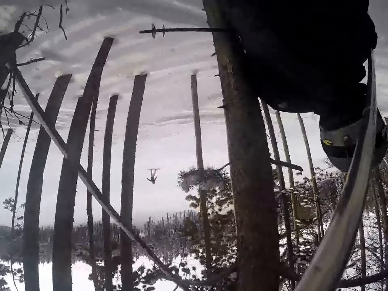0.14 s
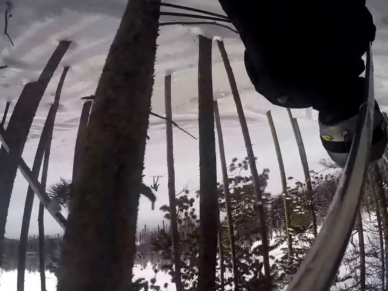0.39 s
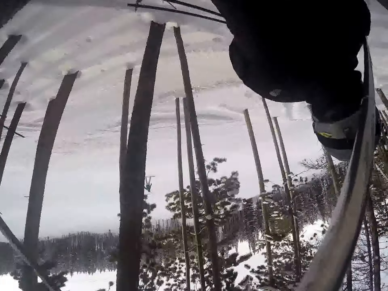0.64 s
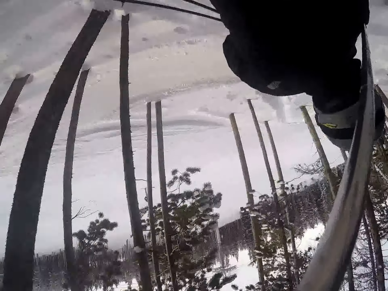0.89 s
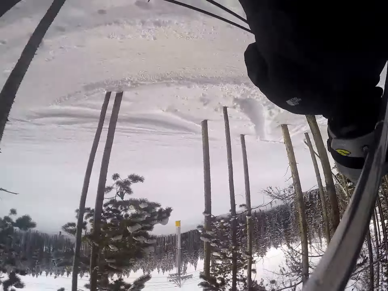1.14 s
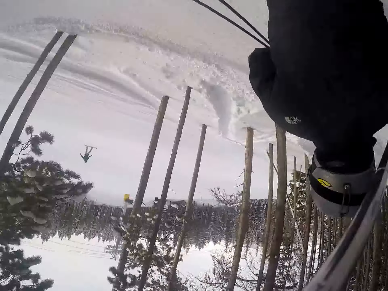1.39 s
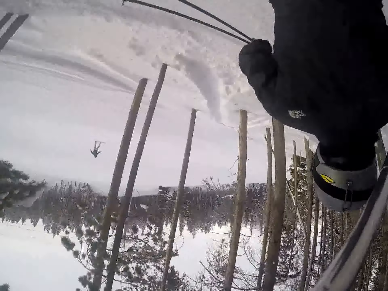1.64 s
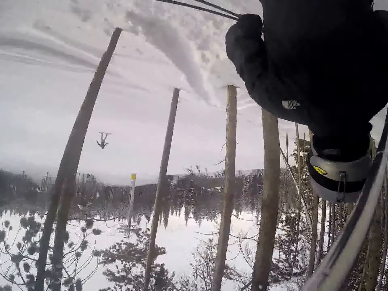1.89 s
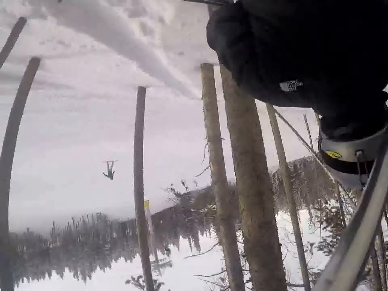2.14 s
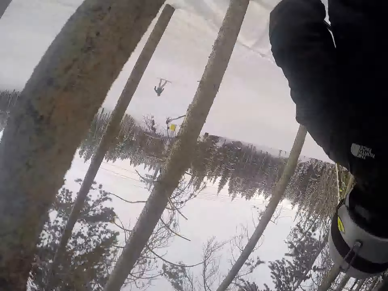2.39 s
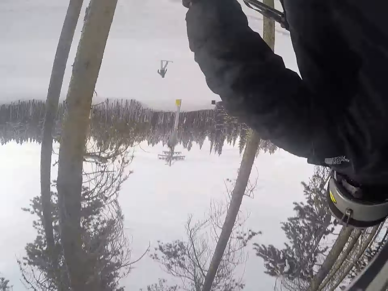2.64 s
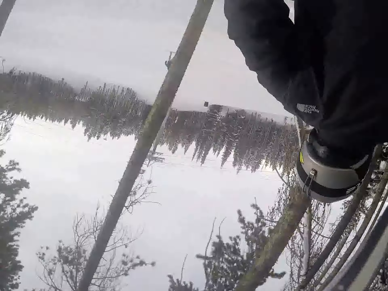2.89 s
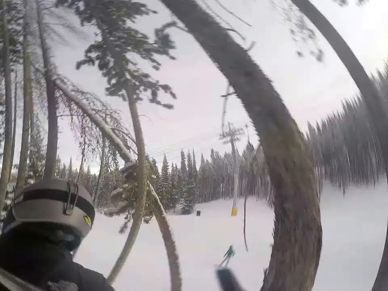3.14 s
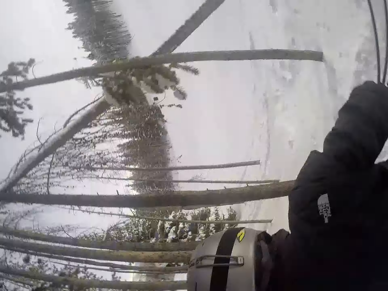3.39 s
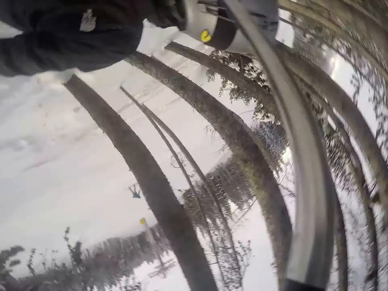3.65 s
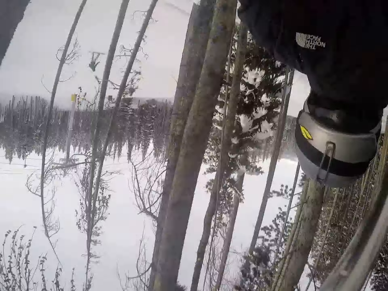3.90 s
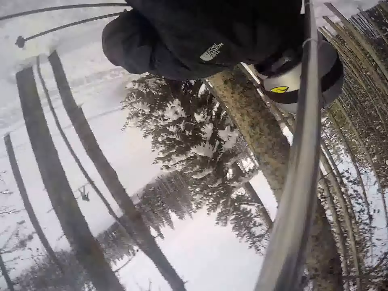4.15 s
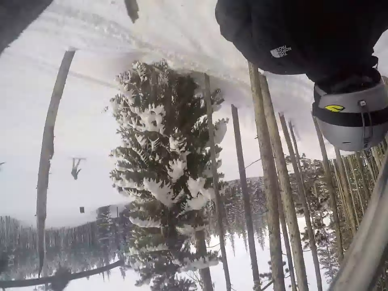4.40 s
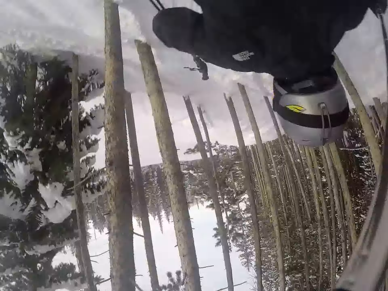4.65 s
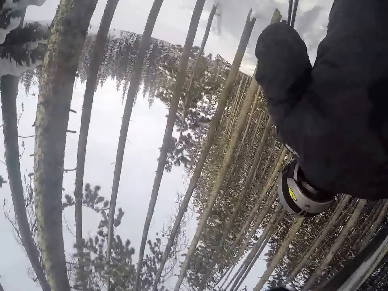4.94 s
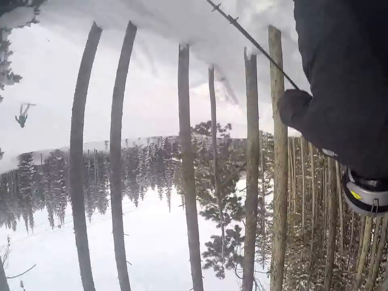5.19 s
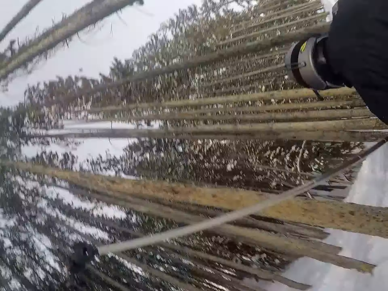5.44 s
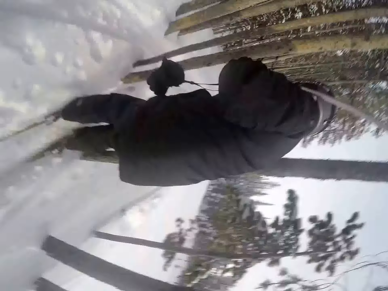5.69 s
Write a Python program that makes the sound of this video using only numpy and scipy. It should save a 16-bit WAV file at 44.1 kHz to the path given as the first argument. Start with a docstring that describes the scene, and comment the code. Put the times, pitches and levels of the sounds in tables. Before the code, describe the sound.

Heard from a single microphone sealed in a plastic camera housing on a pole, a skier passes through snowy trees. Quiet wind rumble and faint swishing brushes come first. After about two and a half seconds, twigs crack and knock hard on the shell in irregular clusters, with deep jolts and hollow scraping. A last thump leaves a very short, thin ring and near silence with tiny ticks.

```python
"""Snowy trees, inside the closed plastic housing of a camera on a pole, with one microphone in the housing.
Wind noise buffets it, grains of snow and needles scrape along it, and bursts of grit crack as twigs on the shell.
Jolts are short swings of mount and pole; a last thump leaves three sine modes of the pole ringing in near
silence, with a few tiny ticks. Rubbing and the bodies of the cracks ring through the housing's resonances."""
import sys
import numpy as np
from scipy import signal
from scipy.fft import rfft, irfft, next_fast_len
from scipy.io import wavfile
from scipy.ndimage import uniform_filter1d, map_coordinates

SR = 44100
rng = np.random.default_rng(int(sys.argv[2]) if len(sys.argv) > 2 else 0)


def ratio_of_db(decibels):
    """Turn decibels (scalar or array-like) into linear amplitude factors; 0 dB maps to 1."""
    return 10 ** (np.asarray(decibels, float) / 20)


def put_to_file(sound):
    """Save the sound as 16-bit audio at rate SR, in the file named by the first command-line argument."""
    columns = np.atleast_2d(sound).T  # one column per channel
    safe = np.clip(columns, -1, 1)
    whole_steps = np.round(safe * 32767)
    wavfile.write(sys.argv[1], SR, whole_steps.astype(np.int16))


N = 255780  # samples


def unit(x):
    """Scale to rms 1."""
    return x / np.sqrt(np.mean(x ** 2) + 1e-20)


def colour(points):
    """Gain against frequency from (Hz, dB) points on a log axis."""
    hz_points, db = np.transpose(points)
    return lambda hz: ratio_of_db(np.interp(np.log(hz + 1), np.log(hz_points + 1), db))


def filtered(x, response):
    """x times a complex response of frequency."""
    n = x.shape[-1]
    padded = next_fast_len(n + 2048)
    spectrum = rfft(x, padded) * response(np.fft.rfftfreq(padded, 1 / SR))
    return irfft(spectrum, padded)[..., :n]


def resonance(hz, centre_hz, width_hz):
    """Response of one damped mode, with gain 1 at its centre."""
    return 1j * hz * width_hz / (centre_hz ** 2 - hz * hz + 1j * hz * width_hz)


def wobble(rate):
    """A smooth random curve, rate knots a second."""
    knots = rng.standard_normal(int(N * rate / SR) + 4)
    return map_coordinates(knots, [np.arange(N) * rate / SR])


def gritty(grain_db, flutter_db):
    """Noise of dense grains with a long tail of sizes, fluttering in strength."""
    grains = rng.standard_normal(N) * ratio_of_db(grain_db * rng.exponential(size=N))
    return grains * ratio_of_db(flutter_db * (wobble(35) + wobble(140)))


def patchy(x, patch_db):
    """x with patches of random gain, some hundred hertz wide and a few hundredths of a second long."""
    spectrum = signal.stft(x, nperseg=512)[2]
    field = rng.standard_normal(spectrum.shape)
    field = uniform_filter1d(field, size=5, axis=0)
    field = uniform_filter1d(field, size=12, axis=1)
    return signal.istft(spectrum * ratio_of_db(patch_db * unit(field)), nperseg=512)[1][:N]


def placed(sounds, times):
    """Sum of short sounds (rows) started at the given seconds."""
    at = np.round(times * SR).astype(int)[:, None] + np.arange(sounds.shape[1])
    return np.bincount(at.ravel(), sounds.ravel(), N + SR)[:N]


def peak_one(sounds):
    """Each row scaled so that its loudest millisecond or so has envelope 1."""
    power = uniform_filter1d(np.abs(signal.hilbert(sounds)) ** 2, size=53, axis=1)
    return sounds / np.sqrt(power.max(axis=1, keepdims=True))


def curves(rows):
    """One value per sample for each column after the time."""
    s, *columns = np.transpose(rows)
    return [np.interp(np.arange(N) / SR, s, column) for column in columns]


# resonances of the housing, the hollow ones first: pitch_hz, width_hz, level_db (before lifts and wall filter)
HOUSING_MODES = [(995, 316, -2), (1252, 330, -6), (1646, 245, 5.5), (2102, 80, -11), (3100, 450, -21)]


def shell(hz, hollow_db, thin_db, scatter_db=np.zeros(len(HOUSING_MODES))):
    """Causal response of the housing; hollow_db lifts its two lowest resonances, thin_db the fourth."""
    lift_db = [hollow_db, hollow_db, 0, thin_db, 0]
    ring = sum(ratio_of_db(db + lift + scatter) * resonance(hz, centre_hz, width_hz)
               for (centre_hz, width_hz, db), lift, scatter in zip(HOUSING_MODES, lift_db, scatter_db))
    walls = (1j * hz / (700 + 1j * hz) / (1 + 1j * hz / 3500)) ** 2  # the walls pass only the middle
    return ring * walls


# twigs and branches touching the shell, at no distance:
# start_s (hardest push follows), level_db (body peak), contact_ms, snap_db (over body), hollow_db (extra lift)
TWIG_CRACKS = [(2.3133, -21, 5.7, -18, 6), (2.5941, -14, 1.4, -26, -14), (2.6645, -21, 3.1, -42, 7),
               (2.6737, 2, 1, -48, -10), (2.6796, -0.5, 2.2, -55.5, -7.5), (2.689, -2, 2.7, -38, -4),
               (2.7077, -6, 1.3, -36, 12), (2.7162, -6.5, 3.7, -41, -6), (2.7312, 4.5, 1.75, -16, -10),
               (2.77, -19.5, 1, -35, -10), (2.775, -16, 2.6, -37, -11), (2.8553, -19, 0.88, -44, 9),
               (2.8678, -2, 0.85, -10, -12), (2.8773, -8.5, 2.5, -22, -5), (2.89, -20, 1, -44, 18),
               (2.8964, -14, 2.3, -37, 2), (2.992, -30, 1.8, -41, -2), (3.0108, -25.5, 10, -27, 23),
               (3.0366, -17, 3, -41, 1), (3.052, -15.5, 5.9, -35.5, 1), (3.0743, -3.5, 2.6, -16.5, -4),
               (3.0798, -9, 3.3, -43.5, -2), (3.0921, -5, 3.5, -4.5, -2), (3.108, -13, 1.3, -44, -4),
               (3.1139, -3.5, 1.4, -68, -16), (3.1606, -6.5, 2.2, -64, -19), (3.1687, -1, 1.2, -27, -8.5),
               (3.2447, -14.5, 3.9, -31, -7), (3.2515, -19, 2.2, -36, -5), (3.3103, -16, 3, -12.5, 11),
               (3.329, -1.5, 4.8, -18.5, 0), (3.3506, -5, 1.6, -36, 12), (3.377, -19.5, 3.5, -43, 11),
               (3.393, -9, 1.06, -25, -9), (3.4001, -9.5, 1.95, -33, -25), (3.4072, -9.5, 2.6, -37, 9),
               (3.46, 0, 2.77, -13.5, -16), (3.497, -24, 5.7, -35, 10), (3.5152, -4.5, 5.7, -16.5, -15.5),
               (3.6394, -19, 2.3, -34, 17), (3.673, -16, 4.8, -23, -25), (3.7074, -19, 1.45, -51, 29),
               (3.714, -21.5, 1.9, -35, 18), (3.732, -22, 11.4, -32, -7), (3.7418, -18, 3.4, -45, -22),
               (3.8424, -23, 3.9, -40, 0), (3.8649, -11, 2.6, -20.5, -3), (3.872, -7.5, 3.3, -23, -10.5),
               (3.9105, -15.5, 1.9, -42, -4), (3.923, -27, 2.2, -46, 14), (4.0908, -28.5, 2.1, -47, 15),
               (4.113, -20.5, 2.7, -40, -10), (4.2076, -17.5, 6.3, -18, 0),
               (4.3616, -10.5, 3.4, -31.5, -5.5), (4.3687, -11.5, 1.7, -29, -5.5),
               (4.405, -13.5, 3.9, -39.5, -8.5), (4.4231, 4.5, 2.1, -27.5, -23),
               (4.4699, -22, 1.6, -41, 0.0), (4.4759, -20.5, 3.7, -23.5, -10.5),
               (4.4888, -16, 2, -16.5, -8), (4.5214, -15.5, 0.51, -36.5, 0.5), (4.5318, 2, 1.9, -17.5, -12),
               (4.5781, -0.5, 0.52, -27.5, -9), (4.584, 1, 2.1, -15.5, -5), (4.605, -9, 2.2, -26, -16),
               (4.6101, 1.5, 1.37, -23.5, 6), (4.6383, -11, 2.2, -34, -30), (4.6846, -14, 0.63, -44.5, 0.5),
               (4.6953, -12, 4.5, -26.5, -12), (4.7076, -7, 4.2, -16.5, -15), (4.7155, -17, 2.9, -44, -2),
               (4.826, -9.5, 4.2, -37.5, 12), (4.8388, 1, 2.85, -33, -5.5), (4.846, -5.5, 1.9, -40, -9),
               (4.861, -12, 3.4, -40.5, -7.5), (4.867, -11.5, 6.8, -16, -13.5),
               (5.1215, -22.5, 1.1, -38.5, 5), (5.144, -13, 1.7, -29, -13), (5.154, -16, 1.1, -44, 19),
               (5.1653, -8.5, 2.3, -52, 6), (5.205, -24, 5.9, -43.5, 5), (5.2322, -5.5, 2.2, -12, -9),
               (5.2375, 0.5, 2.9, -22, -11.5), (5.3518, -26.5, 0.95, -39, -20),
               (5.3891, -15, 1.2, -43.5, 7.5), (5.406, -19.5, 3.5, -38.5, 5.5),
               (5.4159, -6.5, 1.4, -18, 3.5), (5.4244, 5, 2.34, -19, 8.5)]
# spectrum of the snap: pitch_hz, level_db (relative)
SNAP_COLOUR = [(2700, -27.5), (3500, 3), (6000, -12.5), (11000, -29.5), (15800, -42.5), (16600, -58.5)]


def cracks():
    """Each contact is a short burst of grit that rings the shell at new strengths, with a sharper snap on top."""
    contacts = np.vstack([TWIG_CRACKS, twiglets()])
    start_s, level_db, contact_ms, snap_db, hollow_db = contacts.T[..., None]
    lead_s = .008
    u = (np.arange(2048) / SR - lead_s) / (contact_ms / 1000) - .3  # contact lengths from the hardest push
    push = ratio_of_db(np.where(u < 0, 16 * u, -12 * u))  # force builds up and lets go
    drag = ratio_of_db(np.where(u < 0, 7 * u, -3.5 * u) - 25)  # the twig slides on before and after
    # a brief snap of noise, swelling and dying around the hardest push
    snap_swell = ratio_of_db(np.where(u < .1, 22 * (u - .1), -40 * (u - .1)))
    noise = rng.standard_normal((len(contacts), 2, u.shape[1])) * np.hanning(u.shape[1]) ** .5
    scatter_db = 3 * rng.standard_normal((len(contacts), len(HOUSING_MODES))).T[..., None]

    def blunt_shell(hz):
        blunt = (1 + 1j * hz / 2600 - (hz / 2500) ** 2) ** 1.51  # soft bark dulls the treble
        return shell(hz, hollow_db + 11, -7.5, scatter_db) / blunt

    body = peak_one(filtered((push + drag) * noise[:, 0], blunt_shell))
    snap = peak_one(filtered(snap_swell * noise[:, 1], colour(SNAP_COLOUR)))
    return placed(ratio_of_db(level_db) * (body + ratio_of_db(snap_db) * snap), start_s[:, 0] - lead_s)


# stay in the thicket: start_s, end_s
THICKET_SPAN = (2.75, 5.41)


def twiglets(count=40):
    """Small twigs touch at random in the thicket, as strong as the slide presses; rows as in TWIG_CRACKS."""
    draw = rng.random((count, 5))
    start_s, end_s = THICKET_SPAN
    s = start_s + (end_s - start_s) * (np.arange(count) + draw[:, 0]) / count
    press_db = np.interp(s, *np.transpose(SNOW_SLIDE)[:2])
    level_db = press_db + 11.5 - 2.5 * np.log(1 - draw[:, 1])  # a few stand out
    contact_ms = 2.6 * (.5 + draw[:, 2])
    snap_db = -34 + 16 * (draw[:, 3] - .5)
    hollow_db = 32 * (draw[:, 4] - .6)
    return np.transpose([s, level_db, contact_ms, snap_db, hollow_db])


# quick thuds of the mount and slow sways of the pole: peak_s, level_db (swing at its peak), pitch_hz
MOUNT_JOLTS = [(0.503, -23.5, 34.6), (1.356, -34, 63.5), (1.637, -27.5, 63), (2.298, -17.5, 37.0),
               (2.347, -17, 30.5), (2.458, -19, 29.2), (2.554, -18, 44.0), (2.608, -12.5, 25.5),
               (2.674, -12, 160.0), (2.681, -17, 35.0), (2.684, -6, 131), (2.695, -11, 89.0),
               (2.709, -5.5, 137), (2.737, -5, 142.0), (2.747, -5.5, 35.4), (2.792, -11.5, 26.4),
               (2.872, -18.0, 95), (2.884, -13.5, 130), (2.899, -17, 34.7), (3.053, -15, 98),
               (3.066, -23, 85.0), (3.077, -10, 107), (3.094, -0.5, 161), (3.104, -3.5, 39.7),
               (3.172, -15, 167), (3.248, -14.5, 154), (3.263, -15.5, 33), (3.339, -5, 154),
               (3.348, -11.5, 107), (3.346, -6.5, 36.1), (3.406, -16, 129), (3.432, -12, 34.3),
               (3.465, -7.5, 123.0), (3.474, -8, 40.6), (3.644, -14.5, 156), (3.872, -16, 148),
               (3.904, -8, 26.5), (3.951, -15.5, 23.8), (4.214, -11.5, 140.0), (4.22, -17.5, 31.0),
               (4.428, -10, 159), (4.444, -14, 31.8), (4.534, -4.5, 116), (4.571, -13.5, 27.0),
               (4.584, -16.5, 89.0), (4.591, -13, 116), (4.612, -2.5, 210), (4.627, -4, 36.3),
               (4.701, -10, 112), (4.712, -16, 38.0), (4.712, -8.5, 130), (4.746, -22, 110.0),
               (4.833, -16.5, 93), (4.842, -9, 38.3), (4.843, -4, 145.0), (4.853, -10, 162),
               (4.872, -12, 130), (4.899, -7, 25.5), (5.171, -14.5, 168), (5.244, -12, 109),
               (5.255, -11.5, 29.0), (5.421, -2.5, 133.0), (5.44, -16, 33.0)]
# the mount's own resonance, rung by each jolt: pitch_hz, width_hz, level_db (gain at its centre)
MOUNT_MODE = (123, 15, -10)


def jolts():
    """A jolt is a swing of a cycle or two, pushing forward at its peak; the mount rings on briefly."""
    peak_s, level_db, pitch_hz = np.transpose(MOUNT_JOLTS)[..., None]
    cycles = np.arange(6000) / SR * pitch_hz
    rise = 0.43  # cycles up to the peak
    u = cycles / rise
    onset = 1 - np.exp(-(u / .25) ** 2)
    envelope = onset * u ** 0.52 * np.exp(1.424 * (1 - u))
    swing = envelope * np.cos(2 * np.pi * (cycles - rise) + 0.1)
    jolt = placed(ratio_of_db(level_db) * swing, (peak_s - rise / pitch_hz)[:, 0])
    centre_hz, width_hz, ring_db = MOUNT_MODE
    return jolt + ratio_of_db(ring_db) * filtered(jolt, lambda hz: resonance(hz, centre_hz, width_hz))


# ringing modes of the pole: pitch_hz, level_db (relative), t60_s (time to fall 60 dB)
POLE_MODES = [(436, -15, .24), (646, 0, .14), (1878, -7, .2)]


def pole():
    """Three clean modes of the pole die away after the last thump."""
    last_thump_s = 5.427
    t = np.arange(SR // 3) / SR
    ring = sum(ratio_of_db(db - 60 * t / t60) * np.sin(2 * np.pi * hz * t) for hz, db, t60 in POLE_MODES)
    return placed(ratio_of_db(-23.5) * ring[None], np.array([last_thump_s]))


# spectra of swish, spray and rumble (the wind rumbles with it too): pitch_hz, level_db (relative)
SWISH_COLOUR = [(1800, -39), (2450, 5), (2850, -11), (3450, 1.5), (3900, -9.5), (4700, -23), (6000, -44)]
SPRAY_COLOUR = [(3500, -24), (4600, -2), (7000, -5.5), (10000, -9), (14800, -12.5), (15400, -36.5)]
RUMBLE_COLOUR = [(41, -38), (70, -7.5), (168, -8.5), (323, -16), (438, -19), (571, -30), (800, -41.5),
                 (1040, -54), (1760, -120)]


def snow():
    """Snow and needles rub the shell, shake mount and pole, swish around 2 to 4 kHz and spray as fine hiss."""
    scrape, swish, spray = rubbing()
    grit = patchy(gritty(grain_db=3.0, flutter_db=1.5), patch_db=1.5)
    rub = unit(filtered(grit, lambda hz: shell(hz, hollow_db=-0.5, thin_db=15.5)))
    mount = unit(ratio_of_db(3.5 * wobble(30)) * filtered(rng.standard_normal(N), colour(RUMBLE_COLOUR)))
    press = scrape ** 1.518  # only hard rubbing reaches mount and pole
    pole_hz = POLE_MODES[0][0]
    hum = filtered(press * rng.standard_normal(N), lambda hz: resonance(hz, pole_hz, width_hz=12))
    needles = patchy(gritty(grain_db=0.95, flutter_db=0.2), patch_db=2.0)
    brush = swish * unit(filtered(needles, colour(SWISH_COLOUR)))
    fizz = spray * unit(filtered(gritty(grain_db=1, flutter_db=.5), colour(SPRAY_COLOUR)))
    return scrape * rub + ratio_of_db(16) * press * mount + ratio_of_db(28) * hum + brush + fizz


# continuous sliding along the shell, which rises and lulls:
# time_s (levels glide between points), level_db (scrape pressure), fineness_db (swish over scrape)
SNOW_SLIDE = [(0, -47, -16), (.06, -53.5, -1), (.3, -55, -5), (.61, -60, -3.5), (.85, -50.5, -9.5),
              (1.1, -51.5, -6), (2.0, -51.5, -4), (2.22, -42, -9), (2.62, -39.5, -7.5), (2.7, -41, -21),
              (2.88, -37.5, -32), (2.96, -57, -15), (3.05, -39.5, -31), (3.72, -43, -35), (3.8, -60.5, -4),
              (3.86, -37, -26), (4.03, -64.5, 0.5), (4.11, -39.5, -30), (4.35, -41.5, -6.5),
              (4.7, -49.5, -27), (5.1, -50, -19.5), (5.425, -45, -22.5), (5.445, -73.5, 2.5),
              (5.6, -69.5, 4), (5.67, -73, -0.5), (5.8, -68, 2.5)]
# single strokes of a bough or a clump of snow:
# peak_s, level_db (scrape at the peak), release_ms, fineness_db (swish over scrape)
BOUGH_STROKES = [(0.149, -48, 44, 7.5), (.375, -67, 42, 14), (0.477, -43, 51, -7), (.55, -44.5, 52, -9),
                 (.66, -46.5, 28, -15), (.75, -49, 62, -6), (1.03, -66, 88, 3), (1.23, -40, 53, -8.5),
                 (1.63, -53.5, 120, 0), (1.82, -50.5, 60, -1), (2.085, -47.5, 52, -2.5),
                 (2.321, -33, 32, -10), (2.54, -41, 71, -4.5), (2.704, -46, 21, -40),
                 (3.087, -23.5, 8.3, -37), (3.3, -31, 29, -28), (4.17, -38.5, 33, -27.5),
                 (4.39, -37.5, 32, -18), (4.7, -37.5, 48, -20), (4.856, -33.5, 53, -28),
                 (5.02, -47.5, 53, -9), (5.147, -33.5, 15, -26.5), (5.238, -41, 36, -30),
                 (5.409, -33, 10.5, -23.5)]


def rubbing():
    """Gains of scrape, swish and spray: finer snow is brighter, and strokes swell over the continuous slide."""
    fall_db, attack_share, bluntness = 7.5, 0.83, 1.6  # loss over one release; attack over release; flat top
    spray_grows, slide_spray_db, stroke_spray_db = 2.23, -7, -19  # slide spray per dB of fineness; offsets
    press_db, fine_db = curves(SNOW_SLIDE)
    spray_db = press_db + spray_grows * fine_db + slide_spray_db
    power = ratio_of_db([press_db, press_db + fine_db, spray_db]) ** 2
    t = np.arange(N) / SR
    for peak_s, level_db, release_ms, fine in BOUGH_STROKES:
        reach_s = release_ms / 200  # five releases either side
        near = slice(max(0, round((peak_s - reach_s) * SR)), round((peak_s + reach_s) * SR))
        u = (t[near] - peak_s) / (release_ms / 1000)
        swell_db = level_db - fall_db * np.where(u < 0, -u / attack_share, u) ** bluntness
        power[:, near] += ratio_of_db(swell_db + np.array([[0], [fine], [fine + stroke_spray_db]])) ** 2
    return np.sqrt(power)


# small bright ticks of ice crumbs: start_s, level_db (top peak), body_db (over the top)
ICE_TICKS = [(0.2453, -48, -17), (0.3591, -47, 14.5), (0.3786, -58, 16), (0.384, -53.5, 18),
             (2.4468, -50, 0), (5.7648, -54, 13.5), (5.7914, -59, 20.5)]
# spectra of a tick's top and body: pitch_hz, level_db (relative)
TICK_TOP_COLOUR = [(4000, -2), (7500, 14), (15000, -9), (16000, -38)]
TICK_BODY_COLOUR = [(900, -11), (2500, 14), (4000, 6), (6500, -26.5)]


def ticks():
    """Tiny dry ticks of decaying noise: a thin top, and a body where the crumb is larger."""
    start_s, level_db, body_db = np.transpose(ICE_TICKS)[..., None]
    t = np.arange(1024) / SR
    burst = rng.standard_normal((len(ICE_TICKS), 2, len(t))) * ratio_of_db(-60 * t / 0.034)
    top = peak_one(filtered(burst[:, 0], colour(TICK_TOP_COLOUR)))
    body = peak_one(filtered(burst[:, 1], colour(TICK_BODY_COLOUR)))
    return placed(ratio_of_db(level_db) * (top + ratio_of_db(body_db) * body), start_s[:, 0])


# wind on the housing: time_s (levels glide between points), level_db (buffet rms)
WIND_GUSTS = [(0, -38), (.44, -34), (.95, -43.5), (1.34, -28), (1.48, -38.5), (2.29, -25.5), (2.49, -27),
              (3.0, -26), (3.33, -19.5), (3.8, -29), (4.03, -36), (4.17, -22), (4.33, -34), (4.65, -19.5),
              (5.05, -35.5), (5.3, -24.5), (5.42, -28), (5.49, -49)]
# spectrum of the buffeting: pitch_hz, level_db (per hertz, relative)
BUFFET_COLOUR = [(8.2, -28.5), (14, 0.5), (27, -2), (38, -3), (90, -23.5), (120, -24), (200, -120)]


def wind():
    """Gusts buffet the housing as low noise, with a fainter lumpy rumble above."""
    gust, = ratio_of_db(curves(WIND_GUSTS))
    buffet = unit(filtered(rng.standard_normal(N), colour(BUFFET_COLOUR)))
    lumps = unit(ratio_of_db(4.8 * wobble(21)) * filtered(rng.standard_normal(N), colour(RUMBLE_COLOUR)))
    return gust * (buffet + ratio_of_db(-25) * lumps)


def scene():
    """All sources, as the one microphone inside the housing gets them."""
    return (cracks() + jolts() + pole() + snow() + ticks() + wind())[None]


def top_cut(x):
    """Nothing passes above the cut-off."""
    return signal.sosfilt(signal.butter(12, 16520, fs=SR, output="sos"), x)


def record(dry):
    """The microphone input blocks the slowest pressure; the hardest blows overload it and clip."""
    ceiling, hardness = .97, 5.0  # full scale is 1; higher hardness bends more sharply
    coupled = filtered(dry, lambda hz: 1j * hz / (7 + 1j * hz))
    clipped = coupled / (1 + np.abs(coupled / ceiling) ** hardness) ** (1 / hardness)
    return top_cut(clipped)


dry = scene()
out = record(dry)
put_to_file(out)
```